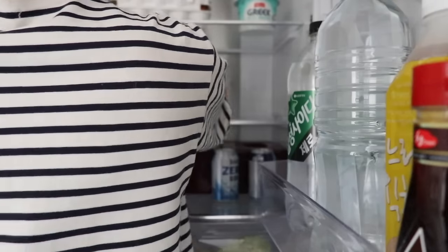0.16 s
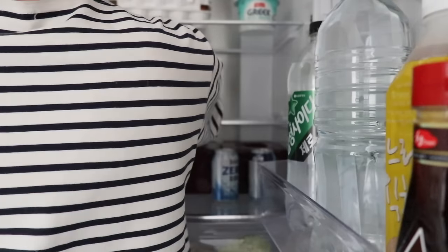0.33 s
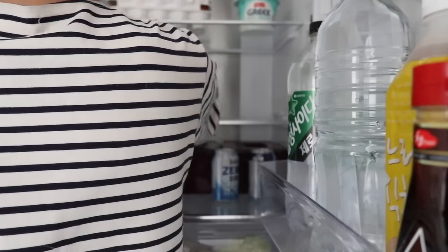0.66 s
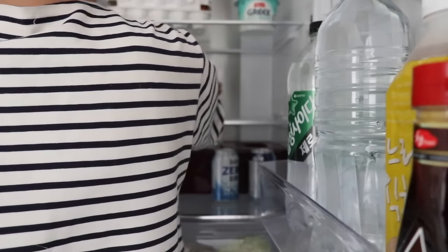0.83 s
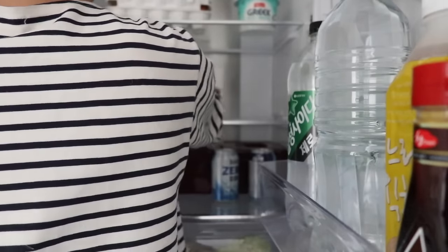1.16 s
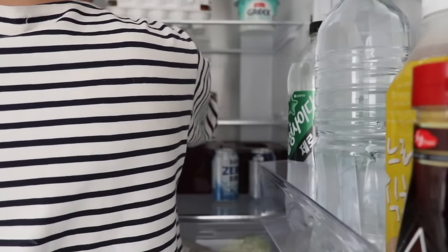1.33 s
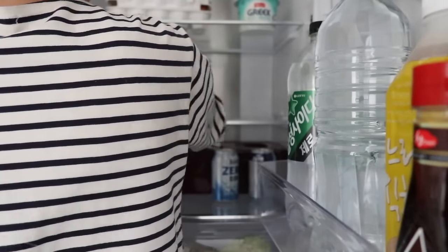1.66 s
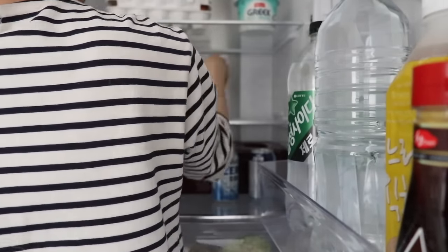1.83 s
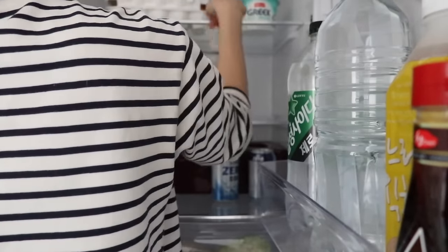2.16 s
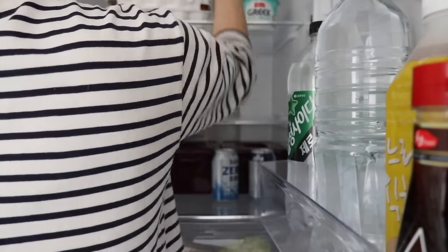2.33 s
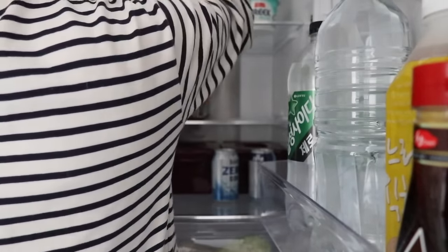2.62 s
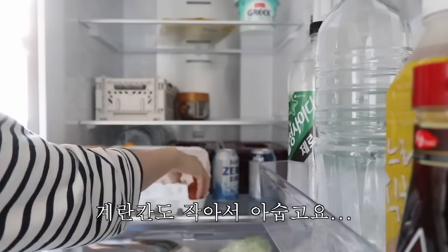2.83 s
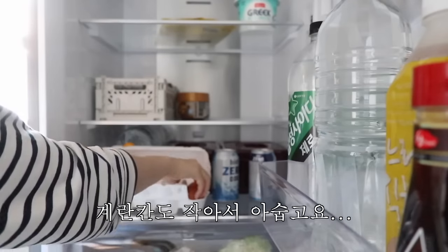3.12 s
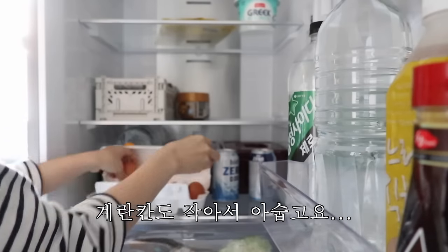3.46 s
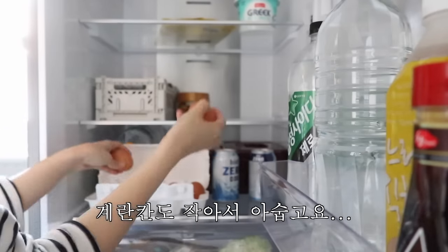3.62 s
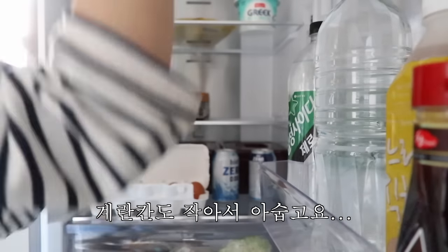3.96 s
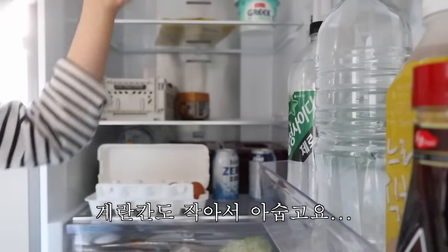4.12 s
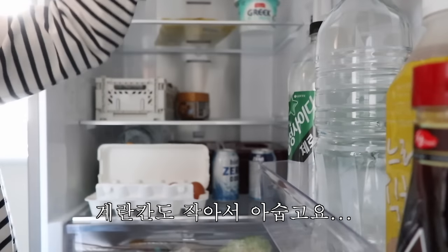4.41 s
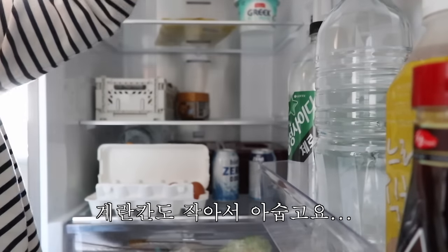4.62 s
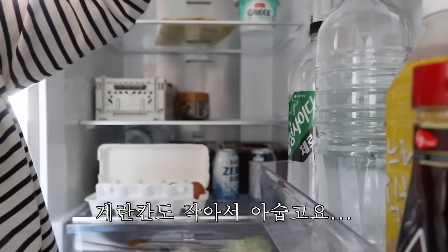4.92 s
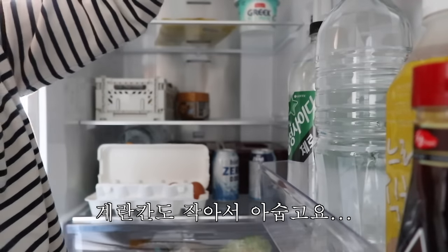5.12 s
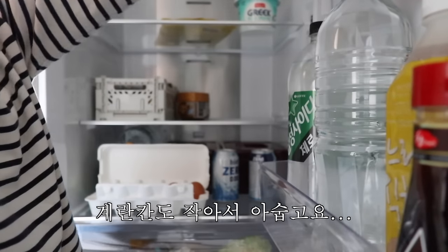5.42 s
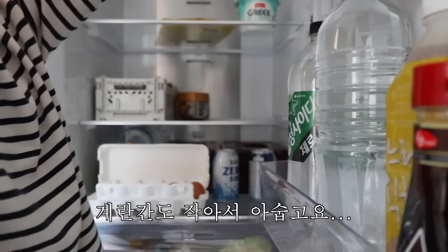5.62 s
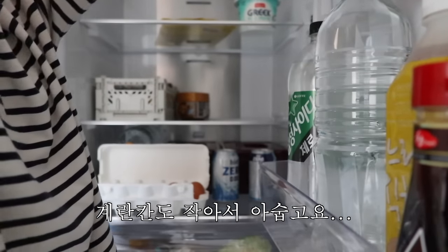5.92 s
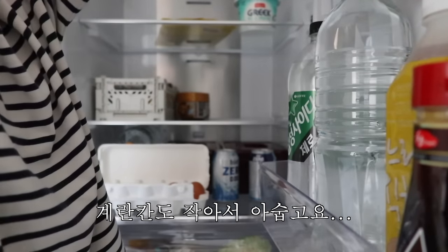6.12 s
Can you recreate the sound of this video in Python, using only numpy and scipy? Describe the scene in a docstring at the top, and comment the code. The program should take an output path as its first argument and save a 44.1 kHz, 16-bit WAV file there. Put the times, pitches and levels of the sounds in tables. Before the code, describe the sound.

A low, steady refrigerator fan and compressor hum runs throughout, with soft hiss from a close stereo microphone. Jars tap faintly on a shelf at the start, knock in a small cluster around 1.3 to 1.5 seconds, and clunk more firmly at 2 seconds, rocking briefly and thudding through the cabinet. Light ticks follow near 2.5 seconds. From about 2.7 to 3.8 seconds a foam egg carton rustles and bumps, with faint high squeaks and one sharp knock at 3.6 seconds. After a short lull, a plastic egg tray slides along the shelf from 4.3 seconds, clattering loudly around 4.7 and knocking again at 5.1, then tapping lightly. From 5.8 seconds to the end at about 6.3, eggs knock into its cups in quick, bright, hollow clacks, among the loudest sounds, while the tray scrapes. Everything has a short cabinet and kitchen echo.

```python
"""Jars knock on a shelf in an open refrigerator, over a steady fan and compressor hum. Then a foam egg
carton rustles and squeaks, a plastic egg tray slides and clatters, and eggs knock into its cups.
Each knock is a short chatter of contacts that rings the shelf or tray and thuds through the cabinet.
Rubbing is a stream of tiny slips. A softly hissing stereo microphone hears it all with two parts:
a middle one for what left and right share, and a side one for how they differ."""
import sys
import numpy as np
from scipy import signal
from scipy.fft import rfft, irfft, next_fast_len
from scipy.io import wavfile
from scipy.ndimage import uniform_filter1d

SR = 44100
rng = np.random.default_rng(int(sys.argv[2]) if len(sys.argv) > 2 else 0)


def to_wav(sig):
    """Store sig (one row per channel, or 1-D mono) as 16-bit WAV at the path in sys.argv[1].

    Samples outside -1..1 are clipped; the rate is SR.
    """
    pcm = np.clip(np.atleast_2d(sig), -1, 1) * 32767
    pcm = np.round(pcm).astype(np.int16)
    wavfile.write(sys.argv[1], SR, pcm.T)  # frames by channels


N = 276948

# Knocks of each thing: (time [s], low ring peak [dB], its pitch [Hz], high ring peak [dB], its pitch [Hz],
# thud peak [dB], tick peak [dB], chatter fade [s], loss per bounce [dB]; 30 or more means no bounce)
JAR_KNOCKS = [(0.051, -53, 360, -43, 2070, -36.5, -53, 0.0056, 40),
              (0.611, -43, 356, -40, 2160, -46, -48, 0.014, 44),
              (1.306, -34.5, 527, -37.5, 2700, -22, -52, 0.009, 3),
              (1.458, -39, 604, -48, 1100, -36, -56, 0.01, 40),
              (1.467, -29, 450, -32, 1480, -21.5, -42, 0.021, 40),
              (1.493, -32.5, 503, -40, 2600, -23, -48, 0.0087, 40),
              (1.57, -53, 500, -47.5, 2900, -47, -53.5, 0.023, 40),
              (1.957, -18.5, 352, -30, 1640, -34, -35.5, 0.016, 40),
              (1.969, -27, 680, -35, 2330, -23, -42, 0.011, 40),
              (1.982, -22.5, 473, -33, 1360, -20, -40.5, 0.01, 2.5),
              (2.108, -27, 344, -44, 1710, -39, -51.5, 0.024, 40),
              (2.505, -61, 1000, -38.5, 2430, -63, -37, 0.01, 40),
              (2.533, -43, 623, -33, 2340, -48, -36, 0.0086, 38),
              (2.547, -42, 1000, -37, 2400, -43, -41, 0.0043, 40),
              (2.667, -54, 382, -33, 1960, -40, -32.5, 0.0027, 40)]
CARTON_KNOCKS = [(2.757, -44, 444, -42.5, 1570, -56, -53, 0.017, 40),
                 (2.818, -41, 350, -34.5, 1510, -30, -41, 0.0074, 40),
                 (2.908, -40, 416, -43, 1600, -26, -58, 0.0074, 40),
                 (2.922, -48, 406, -54, 1600, -23.5, -58, 0.0061, 40),
                 (3.082, -37, 620, -37.5, 1660, -64, -46, 0.014, 40),
                 (3.174, -29.5, 750, -37.5, 1720, -29.5, -45, 0.0097, 40),
                 (3.194, -30, 375, -52, 1720, -25, -53, 0.0038, 40),
                 (3.441, -27.5, 770, -43, 1790, -39, -46, 0.0089, 40),
                 (3.478, -29.5, 606, -30, 1610, -23.5, -61, 0.012, 40),
                 (3.571, -9.5, 933, -16.5, 1280, -17.5, -53, 0.0026, 40),
                 (3.602, -23.5, 840, -21.5, 1300, -16.5, -45, 0.011, 40),
                 (3.64, -30.5, 486, -52, 1230, -21.5, -54, 0.01, 40),
                 (3.679, -35, 576, -34, 1700, -24.5, -61, 0.007, 40),
                 (3.714, -38.5, 920, -58, 1300, -21.5, -56, 0.0068, 40)]
TRAY_KNOCKS = [(4.355, -37.5, 370, -41, 910, -44, -48.5, 0.088, 40),
               (4.449, -35, 466, -39, 1480, -61, -52, 0.02, 40),
               (4.557, -36, 470, -37.5, 980, -51, -44.5, 0.035, 40),
               (4.595, -31, 377, -31.5, 1860, -33.5, -38, 0.01, 40),
               (4.656, -28, 596, -34.5, 1950, -33, -33, 0.038, 40),
               (4.677, -9, 387, -9.5, 1446, -23.5, -15, 0.026, 40),
               (4.703, -11.5, 425, -14, 1500, -30, -19.5, 0.027, 40),
               (4.724, -12, 493, -10, 963, -18.5, -21, 0.0094, 40),
               (4.738, -12, 640, -12.5, 1113, -31, -22, 0.02, 40),
               (4.777, -31, 463, -20, 1200, -26, -31, 0.0092, 40),
               (4.82, -39, 485, -28, 940, -32.5, -41, 0.018, 40),
               (4.856, -27, 657, -41, 1120, -52, -52, 0.0098, 40),
               (4.933, -30.5, 625, -34, 1350, -56, -61, 0.028, 40),
               (4.976, -29, 450, -40, 1200, -33, -63, 0.03, 40),
               (5.025, -29.5, 425, -37, 1010, -58, -45, 0.0074, 40),
               (5.1, -11.5, 443, -14.5, 1187, -24, -33.5, 0.012, 40),
               (5.139, -30, 600, -25.5, 1200, -28, -44, 0.0038, 40),
               (5.182, -30, 450, -32, 1060, -43, -50, 0.038, 3.8),
               (5.486, -28, 456, -31, 1060, -36.5, -41.5, 0.029, 40),
               (5.549, -31.5, 453, -31.5, 1086, -38, -47.5, 0.022, 40),
               (5.629, -32.5, 640, -36, 1000, -45.5, -47, 0.026, 40),
               (5.673, -37, 437, -35.5, 1150, -53, -48, 0.027, 40)]
EGG_KNOCKS = [(5.799, -14.5, 450, -9, 1610, -24.5, -26, 0.0082, 40),
              (5.806, -16, 714, -13, 2120, -25, -39, 0.0028, 40),
              (5.836, -10.5, 590, -14.5, 2400, -21, -31, 0.0087, 40),
              (5.856, -18.5, 470, -15, 1270, -26, -38, 0.01, 40),
              (5.891, -15.5, 636, -17, 1970, -22, -25, 0.013, 40),
              (5.971, -27, 450, -6.5, 1390, -42, -6, 0.0025, 40),
              (5.977, -19, 450, -6.5, 1280, -31, -18, 0.0043, 40),
              (5.991, -21, 455, -24, 1210, -34, -38, 0.0079, 40),
              (6.024, -36, 455, -28, 1345, -46, -50, 0.022, 40),
              (6.137, -21.5, 704, -4, 1530, -30.5, -19, 0.0041, 40),
              (6.152, -27, 361, -15.5, 1290, -43, -43, 0.0058, 40),
              (6.177, -17.5, 720, -13, 2150, -31, -30, 0.0082, 40),
              (6.195, -22, 455, -18, 1540, -44, -45, 0.015, 40),
              (6.209, -32, 455, -19.5, 2090, -56, -25.5, 0.0077, 40)]
# What all knocks of a thing share: (most the low ring loses away from its pitch [dB], thud pitch [Hz],
# thud loss per octave [dB], own high note [dB], own low note [dB], note width [Hz], first contact [gain],
# lean to the left [dB], note in the tick [dB], tick fade-in [s]; if negative, it spans the whole tick)
JAR = (34, 143.5, 24.5, 11, -6, 130, 1.65, 1, -11.5, 0.0015)
CARTON = (24, 231, 20, 14, 10, 101, 0.7, 0, -12, -0.5)
TRAY = (14.5, 251, 8, 13, 1, 98, 0.64, -1.5, -11.5, -0.36)
EGG = (11, 219, 39, 9.5, -9, 115, 1.5, -1.5, -20, 0.003)
# How fast each thing rocks, by name: (time between bounces [s])
BOUNCE_GAP_S = {"jar": 0.029, "carton": 0.038, "tray": 0.04, "egg": 0.03}

# Modes, the notes a struck body rings with; wider ones die sooner: (pitch [Hz], width [Hz], level [dB])
CABINET_MODES = [(83.4, 3.3, 12.5), (98.4, 12, 6.5), (127, 11.5, -0.5), (159, 33, -2), (209, 8, -3),
                 (226, 21.4, 3), (256.3, 28, 0.5)]
SHELF_MODES = [(375, 57, -26), (466, 28, -17), (517, 340, -3), (745, 490, -12), (904, 290, 1),
               (1230, 540, 27), (1480, 500, -3), (1570, 1000, 1), (1930, 220, 12), (2150, 160, 13),
               (2600, 310, 13.5)]
TRAY_MODES = [(386, 37, -2.5), (455, 20, 13.5), (494, 340, 17.5), (640, 29, 9), (661, 85, 6), (709, 5.7, 1),
              (972, 12, 5), (1040, 24, -24), (1270, 46, -6), (1290, 86, 7), (1346, 240, 4),
              (1500, 130, 5.5), (1667, 210, 7.5), (1730, 260, 0), (1990, 210, 10), (2230, 120, 8.5),
              (2970, 290, 10)]
FULL_TRAY_MODES = [(361, 29, -20), (450, 14.4, 4), (720, 45, 4), (960, 18, -7), (1060, 20, 1),
                   (1160, 29, 0.5), (1310, 30, 3), (1348, 9.6, 5.5), (1530, 110, -0.5), (1720, 200, 5.5),
                   (2137, 89, 5.5), (2340, 69, 7), (3050, 110, 10.5), (3540, 59, 6), (4130, 120, 4.5)]  # with eggs in its cups: fewer, clearer notes

# Tone of a contact's tick, of rubbed foam and of its fine fizz: (frequency [Hz], level [dB])
TICK_TONE = [(1470, -100), (2500, 8), (4470, -1.5), (5910, -3.5), (6320, -4.5), (6950, -7.5), (9260, -12.5),
             (11000, -24.5), (11900, -15.5), (14500, -37)]
FOAM_TONE = [(240, 15), (400, 15), (495, -5), (604, 5), (833, 5.5), (1130, -3.5), (1380, 6.5), (1710, 6.5),
             (2150, 1.5), (4210, -2), (9330, -28), (11400, -33), (15500, -53)]
FIZZ_TONE = [(1410, -28), (2400, -2), (3170, -4), (3890, -5.5), (4190, -5), (5490, -8), (9590, -21.5),
             (11300, -21.5), (14500, -39)]
# How hard the carton rubs: (time [s], rub level [dB], cabinet shake [dB])
CARTON_RUB = [(2.7, -72, -76), (2.8, -49, -55), (2.9, -39, -34), (2.96, -47, -44), (3.06, -47, -40.5),
              (3.11, -44, -40), (3.23, -49, -59), (3.414, -54, -54), (3.46, -52.5, -38), (3.6, -42, -32),
              (3.63, -67, -28), (3.735, -70, -36), (3.83, -96.5, -74)]
# How loudly the carton fizzes and the tray drags: (time [s], level [dB])
FIZZ_LEVEL = [(2.72, -50), (2.742, -76), (2.756, -55.5), (2.886, -46.5), (3.072, -52.5), (3.086, -47.5),
              (3.356, -55), (3.38, -53.5), (3.432, -64), (3.444, -52.5), (3.618, -58.5), (3.638, -69),
              (3.692, -63), (3.72, -79)]
TRAY_SLIDE = [(4.25, -87), (4.35, -80), (4.52, -51), (4.8, -35), (5.0, -52.5), (5.094, -37.5), (5.254, -72),
              (5.612, -50), (5.75, -65), (5.982, -29), (6.05, -52), (6.152, -27), (6.28, -44.5)]
# Squeaks of a foam edge: (time [s], level [dB], half length [s])
SQUEAKS = [(3.093, -50, 0.04), (3.256, -56, 0.12), (3.379, -47.5, 0.032), (3.454, -54, 0.037),
           (3.552, -57, 0.067)]

# Echo of the cabinet and kitchen: (frequency [Hz], time to fade by 60 dB [s])
ECHO_FADE = [(100, 0.34), (500, 0.48), (2000, 0.22), (6000, 0.2), (14000, 0.14)]
# Tone of the fan noise and hiss in the middle and side signals: (frequency [Hz], level [dB])
MID_AIR_TONE = [(12, -54), (20, -14), (42, -3), (85, -1.5), (185, -1), (297, -6.5), (361, -9), (404, -10.5),
                (613, -14.5), (1130, -21), (1340, -19.5), (9910, -37.5), (15500, -54)]
SIDE_AIR_TONE = [(12, -72), (20, -26), (238, 3.5), (477, 3.5), (666, -4.5), (787, 0), (905, -3), (984, -2),
                 (3540, -11), (11400, -26), (15500, -35)]
# Hum of the compressor and fan: (pitch [Hz], level before the swell [dB])
HUM_NOTES = [(52, -62), (172, -58), (365, -62), (624, -63)]
# Gentle swell of the whole background: (time [s], boost [dB])
BACKGROUND_SWELL = [(0, 4), (.2, 0.16), (4.3, 1), (6.28, 2)]
# Tone of the microphone's side part, stronger in the treble: (frequency [Hz], level [dB])
SIDE_TONE = [(60, -53), (130, -31), (290, -6.5), (640, -5.5), (1410, 5.5), (3100, 9.5), (6820, 10.5),
             (15000, 19.5)]

SHELF_SPLIT_HZ, TRAY_SPLIT_HZ = 1150, 820  # modes above these form the high ring
TICK_HZ, TICK_OCTAVES_PER_DB, TICK_KNEE_DB = 3073, 0.4, -7.5  # ticks that stand out are brighter
THUD_RISE_S = 0.0079  # the cabinet takes a moment to start swinging
SPOT_DB = 2.0  # each knock hits another spot, so each mode varies by about this much
LANDING_PUSH = 2.3  # extra push on the cabinet as the weight lands
BOUNCE_DULL_DB = 6.5  # a bounce is soft: its ring and tick lose this much more than its thud


def knocks(rows, thing, gap_s, modes, slope_db, low_hz, split_hz, high_hz):
    """Chattering contacts make a ring, a thud and a tick. Returns the sound and its lean to one side."""
    (low_loss_db, thud_hz, thud_slope_db, high_note_db, low_note_db, note_width,
     first_contact, lean_db, tick_note_db, tick_rise_s) = thing
    out = np.zeros((2, N))
    t = np.arange(3000) / SR
    contact_sample = 40
    low_modes = np.array([mode for mode in modes if mode[0] < split_hz])
    high_modes = np.array([mode for mode in modes if mode[0] >= split_hz])
    low_rings = ring(low_modes, low_hz, 1.66 * split_hz)
    high_rings = ring(high_modes, 0.89 * split_hz, high_hz)
    cabinet_rings = ring(CABINET_MODES, 94.6, 314)
    cabinet_gains = gain_of(favour(np.array(CABINET_MODES)[:, 0], thud_hz, thud_slope_db, 20.7))
    swing_up = 1 - np.exp(-np.arange(cabinet_rings.shape[1]) / SR / THUD_RISE_S)
    thud = cabinet_gains @ cabinet_rings * swing_up
    lean = np.tanh(lean_db * np.log(10) / 40)
    for start_s, low_db, body_hz, high_db, clack_hz, thud_db, tick_db, chatter_s in bounces(rows, gap_s):
        fade = np.exp(-t / chatter_s)
        chatter = clicks(len(t), per_s=3000, spread_db=1.67) * fade * np.minimum(t / 0.0034, 1)
        chatter[contact_sample] = first_contact
        push = chatter.copy()
        push[contact_sample] += LANDING_PUSH
        low_spot_db, high_spot_db = np.split(SPOT_DB * rng.standard_normal(len(modes)), [len(low_modes)])
        body = gain_of(low_spot_db + favour(low_modes[:, 0], body_hz, 23.4, low_loss_db)) @ low_rings
        body += gain_of(low_note_db) * note(body_hz, note_width)
        clack = gain_of(high_spot_db + favour(high_modes[:, 0], clack_hz, slope_db, 18.0)) @ high_rings
        clack += gain_of(high_note_db) * note(clack_hz, note_width)
        sound = with_peak(signal.fftconvolve(chatter, body), low_db)
        sound += with_peak(signal.fftconvolve(chatter, clack), high_db)
        sound += with_peak(signal.fftconvolve(push, thud), thud_db)
        octaves_up = np.clip(TICK_OCTAVES_PER_DB * (tick_db - high_db - TICK_KNEE_DB), 0, 1)
        snap = tick(chatter, fade, TICK_HZ * 2 ** octaves_up, tick_note_db, tick_rise_s)
        sound[:len(t)] += with_peak(snap, tick_db)
        add(out, start_s, sound * [[1], [lean]])
    return out


def tick(chatter, fade, pitch_hz, note_db, rise_s):
    """The bright edge of a knock: its contacts, a puff of noise and one short high note."""
    t = np.arange(len(chatter)) / SR
    tone = [(hz, db + favour(hz, pitch_hz, 5.2, 22.0)) for hz, db in TICK_TONE]
    crack = colour(chatter + 0.5 * rng.standard_normal(len(t)) * fade, tone)
    ping = signal.fftconvolve(chatter, note(pitch_hz, width_hz=220.0))[:len(t)]
    fade_in = np.minimum(t / rise_s, 1)
    fade_out = np.cos(np.pi / 2 * t / t[-1]) ** 2
    return (unit_level(crack) + gain_of(note_db) * unit_level(ping)) * fade_in * fade_out


def bounces(rows, gap_s):
    """Gives each knock, plus four ever weaker, dull bounces if the thing rocks before it sits."""
    for start_s, low_db, body_hz, high_db, clack_hz, thud_db, tick_db, chatter_s, loss_db in rows:
        for bounce in range(5 if loss_db < 30 else 1):
            lost_db = bounce * loss_db
            dull_db = lost_db + BOUNCE_DULL_DB * (bounce > 0)
            yield (start_s + bounce * gap_s, low_db - dull_db, body_hz, high_db - dull_db, clack_hz,
                   thud_db - lost_db, tick_db - dull_db, chatter_s)


def sliding_tray():
    """Small slips ring the tray as it drags along the shelf."""
    clumps = gain_of(wander(600))
    slips = clicks(N, per_s=2500, spread_db=4.3) * clumps
    rattle = signal.fftconvolve(slips, ring(TRAY_MODES, 267, 1860).sum(0))[:N]
    # the cabinet's shake grows more slowly than the slide's own level
    stroke = [(time_s, db, -49 + 0.31 * (db + 50)) for time_s, db in TRAY_SLIDE]
    return rub(stroke, rattle)


def rustling_carton():
    """The foam lid and cups rub in clumps of fine slips, with a patchy fizz on top."""
    clumps = gain_of(1.5 * wander(600))
    slips = colour(clicks(N, per_s=3200, spread_db=1.9) * clumps, FOAM_TONE)
    # split fine clicks into a grid of pitch and time, then make random patches louder or softer
    _, _, grid = signal.stft(clicks(N, per_s=9000, spread_db=1.5), SR, nperseg=256)
    patches = uniform_filter1d(rng.standard_normal(grid.shape), size=2, axis=0)
    patches = unit_level(uniform_filter1d(patches, size=14, axis=1))
    fizz = signal.istft(grid * gain_of(4.2 * patches), SR, nperseg=256)[1][:N]
    fizz = unit_level(band(colour(fizz, FIZZ_TONE), 2460, 15000))
    return rub(CARTON_RUB, band(slips, 424, 2070)) + gain_curve(*np.transpose(FIZZ_LEVEL)) * fizz


def rub(stroke, surface):
    """A surface sticks and slips, swelling with the stroke and shaking the cabinet too."""
    times, surface_db, shake_db = np.transpose(stroke)
    jolts = clicks(N, per_s=300, spread_db=6.2)
    shake = signal.fftconvolve(jolts, ring(CABINET_MODES, 100.5, 246).sum(0))[:N]
    rubbing = gain_curve(times, surface_db) * unit_level(surface)
    return rubbing + gain_curve(times, shake_db) * unit_level(shake)


def foam_squeak(pitch_hz=3150):
    """A foam edge slips unevenly and sounds one narrow, high note."""
    t = np.arange(N) / SR
    slips = clicks(N, per_s=760, spread_db=1.8)
    smooth_slips = uniform_filter1d(uniform_filter1d(slips, 90), 90)
    level = sum(gain_of(db) * np.clip(1 - abs(t - time_s) / half_s, 0, 1) ** 2
                for time_s, db, half_s in SQUEAKS)
    return level * unit_level(smooth_slips * np.sin(2 * np.pi * pitch_hz * t))


def cabinet_echo(sound):
    """The open cabinet and kitchen answer with a short echo: one for the middle, one for the side."""
    hz, t, grid = signal.stft(rng.standard_normal((2, SR // 2)), SR, nperseg=256)
    fade = gain_of(-60 * t / look_up(ECHO_FADE, hz)[:, None])
    tail = signal.istft(grid * fade, SR, nperseg=256)[1]
    tail *= np.clip(np.arange(tail.shape[1]) / SR / 0.0018 - 0.5, 0, 1)  # walls answer after about 2 ms
    return signal.fftconvolve(sound[None], tail / np.linalg.norm(tail[0]), axes=1)[:, :N]


def fan_and_compressor():
    """Fan noise and hiss, separate for middle and side, with a wavering hum in the middle."""
    t = np.arange(N) / SR
    mid = gain_of(-48.5) * unit_level(colour(rng.standard_normal(N), MID_AIR_TONE))
    side = gain_of(-52.5) * unit_level(colour(rng.standard_normal(N), SIDE_AIR_TONE))
    for hz, db in HUM_NOTES:
        waver = wander(6000)
        pitch_hz = hz + 2.91 * waver[::-1]
        mid += gain_of(db + 2.0 * waver) * np.sin(2 * np.pi * np.cumsum(pitch_hz) / SR)
    return np.array([mid, side]) * gain_of(np.interp(t, *np.transpose(BACKGROUND_SWELL)))


def note(hz, width_hz):
    """One mode after a tap: a sine wave that dies away."""
    t = np.arange(SR // 6) / SR
    return np.sqrt(width_hz) * np.exp(-np.pi * width_hz * t) * np.sin(2 * np.pi * hz * t)


def ring(modes, low_hz, high_hz):
    """How a body rings after one tap, one row for each mode, kept within a band."""
    hz, width_hz, db = np.transpose(modes)[:, :, None]
    t = np.arange(SR // 6) / SR
    fade_out = np.cos(3 * np.pi * t)
    return band(gain_of(db) * note(hz, width_hz), low_hz, high_hz) * fade_out


def clicks(size, per_s, spread_db):
    """Tiny clicks at random moments, with random sign and uneven strength."""
    chance, sign, strength = rng.random(size), rng.standard_normal(size), rng.exponential(1, size)
    return (chance < per_s / SR) * np.sign(sign) * gain_of(spread_db * np.minimum(strength, 4))


def wander(samples):
    """A random drift: noise smoothed over this many samples."""
    return unit_level(uniform_filter1d(rng.standard_normal(N), samples))


def favour(hz, centre_hz, slope_db, most_db):
    """Level change in dB: down by slope_db for each octave from the centre, by most_db at most."""
    return -np.minimum(slope_db * abs(np.log2(np.asarray(hz) / centre_hz)), most_db)


def band(sound, low_hz, high_hz):
    """Keeps a band of pitches: small bodies give off no bass, soft contacts stir no treble."""
    return signal.sosfilt(signal.butter(3, [low_hz, high_hz], "band", fs=SR, output="sos"), sound)


def colour(sound, tone, turn=1):
    """Shapes a sound by a tone table; turn=-1j also delays each wave by a quarter cycle."""
    size = next_fast_len(len(sound))
    gains = gain_of(look_up(tone, np.fft.rfftfreq(size, 1 / SR)))
    return irfft(rfft(sound, size) * turn * gains, size)[:len(sound)]


def look_up(table, hz):
    """Reads between a table's rows, with frequency spaced by octaves."""
    table_hz, values = np.transpose(table)
    return np.interp(np.log(hz + 1), np.log(table_hz + 1), values)


def gain_curve(times, db):
    """A gain that glides through the given levels and is silent before and after."""
    return gain_of(np.interp(np.arange(N) / SR, times, db, left=-120, right=-120))


def gain_of(db):
    """Turns decibels into a number to multiply by."""
    return 10 ** (np.asarray(db) / 20)


def unit_level(sound):
    """Scales a sound so its average (rms) level is 1."""
    return sound / np.sqrt(np.mean(sound ** 2) + 1e-20)


def with_peak(sound, db):
    """Scales a sound to the given peak level."""
    return gain_of(db) * sound / (abs(sound).max() + 1e-20)


def add(mix, start_s, sound):
    """Mixes a sound in at its start time."""
    part = mix[:, round(start_s * SR):][:, :sound.shape[1]]
    part += sound[:, :part.shape[1]]


def scene():
    """Mixes knocks, rubbing, echo and background as middle and side, then makes left and right."""
    on_shelf = dict(modes=SHELF_MODES, slope_db=35.0, low_hz=282, split_hz=SHELF_SPLIT_HZ)
    on_tray = dict(modes=TRAY_MODES, slope_db=13.0, low_hz=300, split_hz=TRAY_SPLIT_HZ)
    on_full_tray = dict(modes=FULL_TRAY_MODES, slope_db=13.4, low_hz=288, split_hz=TRAY_SPLIT_HZ)
    jars = knocks(JAR_KNOCKS, JAR, BOUNCE_GAP_S["jar"], **on_shelf, high_hz=2940)
    carton = knocks(CARTON_KNOCKS, CARTON, BOUNCE_GAP_S["carton"], **on_shelf, high_hz=2400)
    tray = knocks(TRAY_KNOCKS, TRAY, BOUNCE_GAP_S["tray"], **on_tray, high_hz=3180)
    eggs = knocks(EGG_KNOCKS, EGG, BOUNCE_GAP_S["egg"], **on_full_tray, high_hz=4800)
    knocking, lean = jars + carton + tray + eggs
    direct = knocking + rustling_carton() + foam_squeak() + sliding_tray()
    mid_echo, side_echo = cabinet_echo(band(direct, 135, 14200))
    mid = direct + gain_of(-8.0) * mid_echo
    # the side part senses pressure differences, so it is a quarter cycle off from the middle
    side = colour(gain_of(-11.0) * direct, SIDE_TONE, turn=-1j)
    side += colour(gain_of(-12.0) * side_echo, SIDE_TONE) + band(lean, 130, 3700)
    mid, side = np.array([mid, side]) + fan_and_compressor()
    return np.array([mid + side, mid - side])


def record(dry):
    """The microphone's input rounds off the highest peaks, then the very top treble is cut."""
    treble_cut = signal.firwin(1023, cutoff=15150, window=("kaiser", 9), fs=SR)
    return signal.oaconvolve(np.tanh(dry), treble_cut[None], "same")


dry = scene()
out = record(dry)
to_wav(out)
```